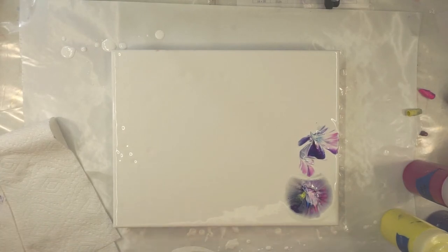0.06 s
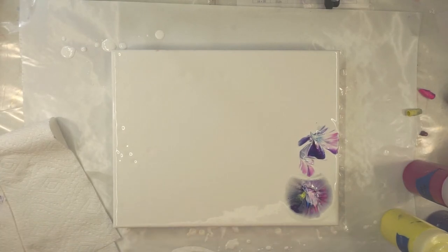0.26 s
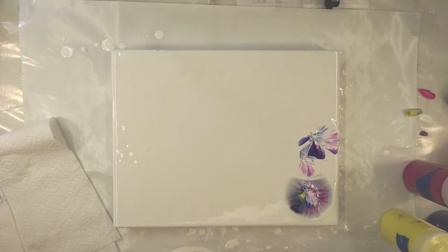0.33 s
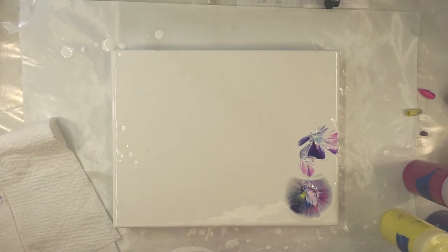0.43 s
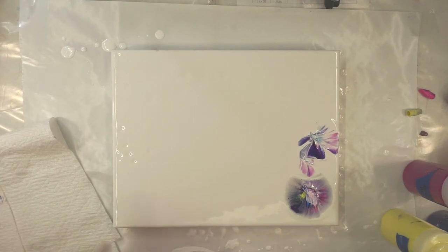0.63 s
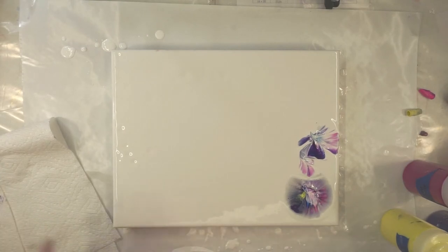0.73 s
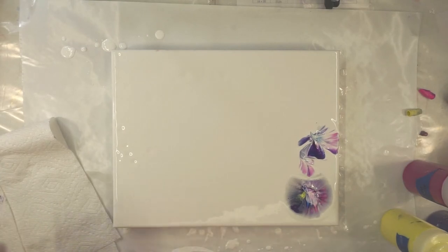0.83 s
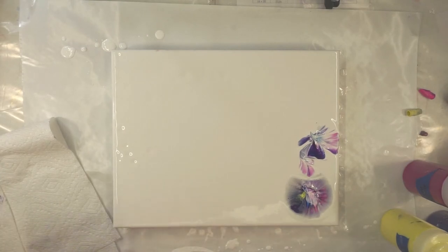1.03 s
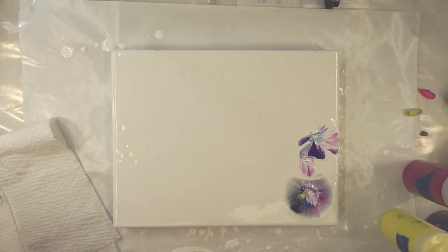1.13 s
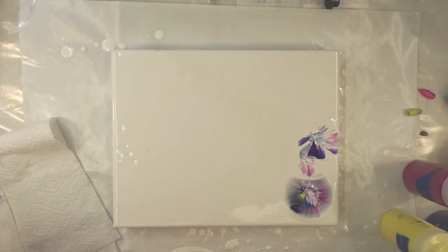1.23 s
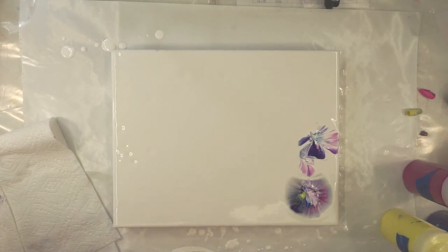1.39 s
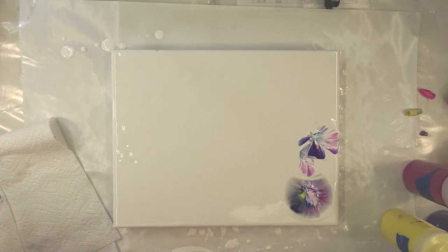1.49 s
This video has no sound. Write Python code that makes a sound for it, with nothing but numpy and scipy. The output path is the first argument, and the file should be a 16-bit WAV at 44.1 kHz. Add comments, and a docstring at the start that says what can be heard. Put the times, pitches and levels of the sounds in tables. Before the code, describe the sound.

A small hollow plastic object clatters onto a table at about 0.2 seconds, slides briefly and lands with a knock at 0.4. Light ticks follow, with a faint brush near 0.9 seconds. One sharp, bright snap comes at about 1.2 seconds, then a soft bump on the table near 1.4. The small room echoes slightly, with steady hiss and a faint fan underneath throughout.

```python
"""A hollow object set down on a table

A small hollow object, probably plastic, clatters, slides and lands with a knock: each contact clicks
and sets its walls, its rim and the air inside ringing. Light ticks and a brief brush follow, then one
sharp snap and a soft bump that rings the table board. A small room echoes all of this,
and steady hiss and a faint fan lie underneath."""
import sys
import numpy as np
from scipy import signal
from scipy.fft import rfft, irfft, next_fast_len
from scipy.io import wavfile

SR = 44100
rng = np.random.default_rng(int(sys.argv[2]) if len(sys.argv) > 2 else 0)


def log_audio(samples):
    """Write samples as a 16-bit WAV file to the path given in sys.argv[1]."""
    # one column per channel
    frames = np.atleast_2d(samples).T
    # limit to full scale, then quantise
    limited = np.clip(frames, -1, 1)
    pcm = np.round(limited * 32767).astype(np.int16)
    wavfile.write(sys.argv[1], SR, pcm)


N = 68355

# A "colour" says how strong low and high pitches are. A "t60" is the time taken to fade by 60 dB.
# colour of the hiss: f/Hz, level/dB
HISS_COLOUR = [(40, -46), (70, -44), (90, -25.5), (130, -21), (180, -19.5), (290, -7.5), (400, -10),
               (600, -3.5), (740, -3), (1050, -8), (1400, -8), (2000, -10.5), (5000, -12.5), (11000, -17)]
# tones of the fan: f/Hz, level/dB
FAN_TONES = [(105, -93), (285, -86), (680, -85.5), (748, -77.5), (840, -84.5), (959, -79.5)]
# how alike left and right are in sound that comes from all around: f/Hz, likeness (1 = the same)
STEREO_LIKENESS = [(100, 0.75), (450, 0.82), (1000, 0.63), (2500, 0.28), (4500, 0.028), (8000, 0.27),
                   (11000, .15)]
# how long the room echoes: f/Hz, t60/s
ROOM_T60 = [(100, 0.85), (500, 0.52), (2000, 0.55), (6000, 0.49), (11000, 0.48)]
# colour of the brush: f/Hz, level/dB
BRUSH_COLOUR = [(200, -41), (700, -6), (1400, 3), (2500, -5), (6000, -5), (10500, -14)]
# light touches: t/s, level/dB, f/Hz
TICKS = [(0.5546, -45.5, 2600), (0.5727, -52, 2700), (0.6149, -49.5, 2700), (.657, -51.5, 1870),
         (0.8521, -54, 1700), (1.1241, -53.5, 3000), (1.1484, -44, 3940), (1.1496, -43.5, 1305)]
# soft contacts with the table: t/s, board level/dB, tap level/dB
BUMPS = [(1.149, -60, -64), (1.175, -59.5, -69), (1.4234, -58, -45), (1.4394, -43.5, -66),
         (1.461, -68, -49), (1.521, -64, -64)]
# tones of the table board: f/Hz, level/dB, t60/s
BOARD_TONES = [(96.6, -21, 0.26), (147, -13.5, 0.113), (269.5, -2.5, 0.14), (615, -14, 0.084)]
# colour of a soft tap: f/Hz, level/dB
TAP_COLOUR = [(80, -28), (300, -8), (500, -2), (620, 7.5), (800, -0.5), (1250, 1), (2000, -19), (5000, -22),
              (10000, -32)]
# colour of the snap: f/Hz, level/dB
SNAP_COLOUR = [(60, -24), (160, -14), (280, -11), (500, -18), (1500, -11), (2600, -5), (4000, 0),
               (5600, 2.5), (7300, -0.5), (9000, -8.5), (11000, -15.5)]
# the snap's echoes from nearby surfaces: delay/s, level/dB
SNAP_ECHOES = [(.0036, -10), (.0075, -16), (.011, -9)]
# how the slide swells and fades: t/s, level/dB
SLIDE_LEVELS = [(.195, -66), (.212, -53), (.235, -53), (.27, -49), (.305, -55), (.335, -51), (.36, -52),
                (.392, -48.5), (.42, -60), (.46, -71)]
# colour of the slide: f/Hz, level/dB
SLIDE_COLOUR = [(30, -60), (80, -46), (200, -20), (350, -11), (550, 3.5), (1200, 0.5), (2600, -6),
                (4500, -11.5), (10500, -16)]
# the object's contacts: t/s, click level/dB, wall level/dB (halved in the mix), cavity level/dB,
# rim level/dB, f/Hz above which click and walls are dulled, rattle level/dB relative to the click
KNOCKS = [(.2238, -35, -44, -40.5, -41.5, 9000, 9), (.2257, -36, -31.5, -34, -45.5, 980, 7.5),
          (.2313, -39, -37.5, -40.5, -60, 700, -8), (.2384, -38, -52, -42, -56, 11000, 13),
          (.2402, -18.5, -25.5, -39, -44, 4950, -0.5), (.2632, -39, -43, -45.5, -59, 6000, 2),
          (.3238, -34.5, -45, -41.5, -57, 12000, 10), (.3250, -35, -41.5, -39.5, -55, 9000, 11),
          (0.3958, -25.5, -28, -29.5, -49, 1350, -1.5), (.4000, -40, -37, -26, -58, 990, 5)]
# colour of a contact's click: f/Hz, level/dB
CLICK_COLOUR = [(30, -21), (80, -33), (200, -25), (350, -14.5), (550, -2.5), (1200, 5.5), (3000, -3.5),
                (5000, -4.5), (10500, -8)]
# tones of the object's walls before it lands: f/Hz, level/dB, t60/s
WALL_TONES = [(612, -8.5, .06), (716.3, -2, 0.065), (817, -10, 0.064), (934, -12, 0.052),
              (1024.6, -3, 0.08), (1210, -12, 0.084), (1302, -9.5, 0.085), (1386, -6, 0.054),
              (1760, -6.5, 0.051), (1963, -8, 0.047), (2300, -14, 0.082), (2420, -12.5, .06),
              (2950, -14, 0.045)]
# tones of its hard rim: f/Hz, level/dB, t60/s
RIM_TONES = [(3126, -1.5, 0.021), (3355, 0, .02), (3910, -2, 0.023), (6720, -5.5, 0.027)]
# tones of its cavity, the air inside: f/Hz, level/dB, t60/s
CAVITY_TONES = [(519.5, -3.5, 0.071), (276, -22, 0.052)]

OBJECT_PAN_DB = -2.5  # left minus right
RING_SAMPLES = 8192  # length of one contact's sound


def amp(db):
    """Turn decibels into a gain to multiply by."""
    return 10 ** (np.asarray(db) / 20)


def unit(x):
    """Scale a sound to an average (rms) size of 1."""
    return x / np.sqrt(np.mean(x ** 2) + 1e-20)


def along(points, hz):
    """Read between the rows of a (frequency, value) table, on a log frequency scale."""
    freqs, values = np.transpose(points)
    return np.interp(np.log(hz + 1), np.log(freqs + 1), values)


def gains(colour):
    """Turn a colour table into a function that gives the gain at any frequency."""
    return lambda hz: amp(along(colour, hz))


def filtered(x, response):
    """Multiply each frequency in a sound by response(hz)."""
    size = next_fast_len(x.shape[-1] + 8192)
    hz = np.fft.rfftfreq(size, 1 / SR)
    return irfft(rfft(x, size) * response(hz), size)[..., :x.shape[-1]]


def low_cut(x, hz):
    """Weaken the bass below hz."""
    return signal.sosfilt(signal.butter(2, hz, 'high', fs=SR, output='sos'), x)


def add(track, start_s, sound):
    """Mix a sound into the track at start_s."""
    part = track[..., round(start_s * SR):][..., :sound.shape[-1]]
    part += sound[..., :part.shape[-1]]


def pan(db):
    """Left and right gains, with the left db decibels above the right."""
    return amp(np.array([[db], [-db]]) / 2)


def left_first(pair, lead_s):
    """Make the left side arrive lead_s seconds before the right."""
    return filtered(pair, lambda hz: np.exp(1j * np.pi * hz * lead_s * np.array([[1], [-1]])))


def spread(pair):
    """Blend two unrelated noises so that they seem to come from all around."""
    angle = lambda hz: np.arccos(np.clip(along(STEREO_LIKENESS, hz), -1, 1)) / 2
    mid, side = filtered(pair, lambda hz: np.array([np.cos(angle(hz)), np.sin(angle(hz))]))
    return np.array([mid + side, mid - side])


def click(response, rattle_db, t60):
    """A pulse that peaks at 1 and its short noisy rattle, both coloured by response(hz)."""
    t = np.arange(RING_SAMPLES) / SR
    hz = np.fft.rfftfreq(RING_SAMPLES, 1 / SR)
    # build the pulse so that nothing sounds before the hit (minimum phase)
    cepstrum = irfft(np.log(np.maximum(response(hz), 1e-6)))
    cepstrum[1:RING_SAMPLES // 2] *= 2
    cepstrum[RING_SAMPLES // 2 + 1:] = 0
    pulse = irfft(np.exp(rfft(cepstrum)))
    noise = rng.standard_normal(RING_SAMPLES) * amp(-60 * t / t60)
    rattle = signal.fftconvolve(pulse, noise / np.linalg.norm(noise))[:RING_SAMPLES]
    return (pulse + amp(rattle_db) * rattle) / np.abs(pulse).max()


def ring(tones, scatter_db, response=lambda hz: 1):
    """A struck body's fading tones, alternating in sign, their levels a little different each hit."""
    t = np.arange(RING_SAMPLES) / SR
    out = np.zeros(RING_SAMPLES)
    for k, (hz, db, t60) in enumerate(tones):
        fade = amp(db + scatter_db * rng.standard_normal() - 60 * t / t60)
        out += (-1) ** k * response(hz) * fade * np.sin(2 * np.pi * hz * t)
    return out


def friction(colour, slips_per_s=6000):
    """Rubbing surfaces make a stream of tiny slips of random size."""
    slips = rng.standard_normal(N) * (rng.random(N) < slips_per_s / SR)
    return unit(filtered(slips, gains(colour)))


def in_room(x, echo_db, early_db=-4, early_t60=0.074, tail_db=-7.5, build_s=0.0059):
    """The direct sound, early echoes off the table and the room's fading tail, in stereo."""
    hz, frame_s, spectrum = signal.stft(rng.standard_normal((2, SR // 2)), SR, nperseg=256)
    fade = amp(-60 * frame_s / along(ROOM_T60, hz)[:, None])
    tail = signal.istft(spectrum * fade, SR, nperseg=256)[1]
    t = np.arange(tail.shape[1]) / SR
    tail *= 1 - np.exp(-t / build_s)
    tail *= amp(tail_db) / np.linalg.norm(tail[0])
    early = rng.standard_normal(tail.shape) * amp(-60 * t / early_t60) * (t > .002)
    early *= amp(early_db) / np.linalg.norm(early[0])
    room = amp(echo_db) * spread(tail + early)
    room[:, 0] += 1  # the direct sound
    return signal.fftconvolve(x[None], room, axes=1)


def hiss():
    """Steady soft noise from all around."""
    noise = filtered(rng.standard_normal((2, N)), gains(HISS_COLOUR))
    return amp(-62) * unit(spread(noise))


def fan(width_hz=5.5):
    """A faint fan hums in fuzzy tones, each a narrow band of noise."""
    out = np.zeros(N)
    for pitch_hz, db in FAN_TONES:
        band = lambda hz: 1 / (1 + ((hz - pitch_hz) / width_hz) ** 2)
        out += amp(db) * unit(filtered(rng.standard_normal(N), band))
    return out


def brush(start_s=.925, level_db=-56, rise_s=0.012, t60=0.18):
    """Something brushes by: rubbing that swells quickly and fades."""
    age = np.arange(N) / SR - start_s
    rise = np.clip(age / rise_s, 0, 1)
    fade = amp(level_db - 60 * np.maximum(age - rise_s, 0) / t60)
    return in_room(rise * fade * friction(BRUSH_COLOUR), echo_db=4.5)[:, :N]


def ticks(width_share=0.23):
    """Light touches, each ringing briefly in one broad band around its pitch."""
    out = np.zeros((2, N))
    for start_s, db, pitch_hz in TICKS:
        band = lambda hz: hz / np.hypot(pitch_hz ** 2 - hz ** 2, hz * pitch_hz * width_share)
        tick = amp(db) * click(band, rattle_db=-3.5, t60=0.024)
        add(out, start_s, in_room(tick, echo_db=4))
    return out


def bumps():
    """Soft contacts make a dull tap and set the table board ringing."""
    out = np.zeros((2, N))
    for start_s, board_db, tap_db in BUMPS:
        tap = amp(tap_db) * click(gains(TAP_COLOUR), rattle_db=3, t60=0.085)
        board = amp(board_db) * low_cut(ring(BOARD_TONES, scatter_db=2), hz=110)
        add(out, start_s, in_room(tap, echo_db=-2.5))
        add(out, start_s, in_room(board, echo_db=-12))
    return out


def snap(start_s=1.1742, level_db=-22.5):
    """One bright snap, a little to the left, travels through the plastic and echoes off surfaces."""
    out = np.zeros((2, N))
    crack = amp(level_db) * click(gains(SNAP_COLOUR), rattle_db=-6, t60=.03)
    travel_s = 0.000504  # at 5000 Hz; the plastic bends in waves, and lower ones arrive later
    crack = filtered(crack, lambda hz: np.exp(-4j * np.pi * travel_s * np.sqrt(5000 * hz)))
    add(out, start_s, in_room(crack, echo_db=1))
    for delay_s, db in SNAP_ECHOES:
        add(out, start_s + delay_s, in_room(amp(db) * crack, echo_db=0.5))
    return left_first(out, lead_s=.00005) * pan(db=1)


def slide():
    """The object rubs along the table between its knocks."""
    t = np.arange(N) / SR
    level_db = np.interp(t, *np.transpose(SLIDE_LEVELS), left=-120, right=-120)
    rubbing = amp(level_db) * friction(SLIDE_COLOUR)
    return in_room(rubbing, echo_db=2.5)[:, :N] * pan(OBJECT_PAN_DB)


def knocks(landing_s=.39, low_hz=287):
    """Each contact clicks and rings the object's walls, rim and cavity; some are bright, others dull."""
    out = np.zeros((2, N))
    for start_s, click_db, wall_db, cavity_db, rim_db, bright_hz, rattle_db in KNOCKS:
        dulling = lambda hz: 1 / np.hypot(1, hz / bright_hz)
        response = lambda hz: gains(CLICK_COLOUR)(hz) * dulling(hz)
        crack = amp(click_db) * click(response, rattle_db, t60=0.021)
        damping = 1.46 if start_s > landing_s else 1  # once it has landed, the walls fade faster
        wall_tones = [(hz, db, t60 / damping) for hz, db, t60 in WALL_TONES]
        walls = amp(wall_db) * ring(wall_tones, scatter_db=2, response=dulling)
        rim = amp(rim_db) * ring(RIM_TONES, scatter_db=3.5)
        shell = low_cut(walls / 2 + rim, low_hz)
        cavity = amp(cavity_db) * low_cut(ring(CAVITY_TONES, scatter_db=1), low_hz)
        add(out, start_s, in_room(crack + shell, echo_db=-0.5) * pan(OBJECT_PAN_DB))
        add(out, start_s, in_room(cavity, echo_db=-7.5))
    return out


def scene():
    """The sounds on the table, over the hiss and the fan."""
    events = knocks() + slide() + brush() + ticks() + snap() + bumps()
    background = (hiss() + fan()) * pan(db=-1.4)
    return events + background


def record(dry, top_hz=11060):
    """Cut away the treble above top_hz, by 1 dB for every 12 Hz and by 100 dB at most."""
    return filtered(dry, lambda hz: amp(-np.clip((hz - top_hz) / 12, 0, 100)))


dry = scene()
out = record(dry)
log_audio(out)
```